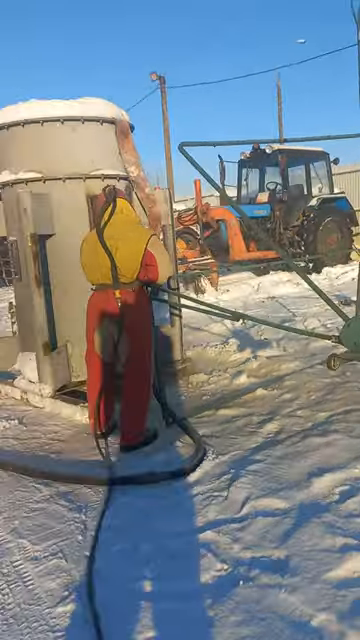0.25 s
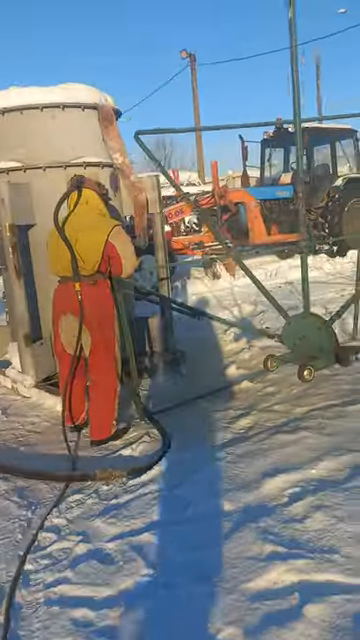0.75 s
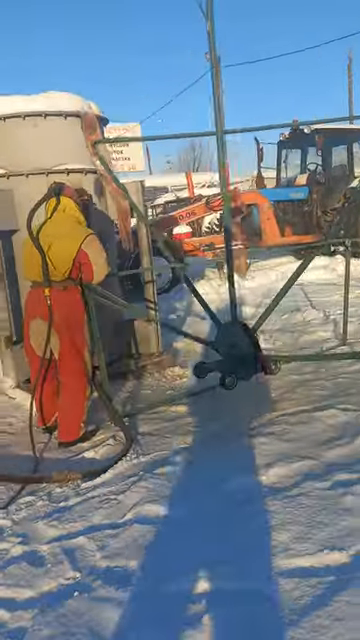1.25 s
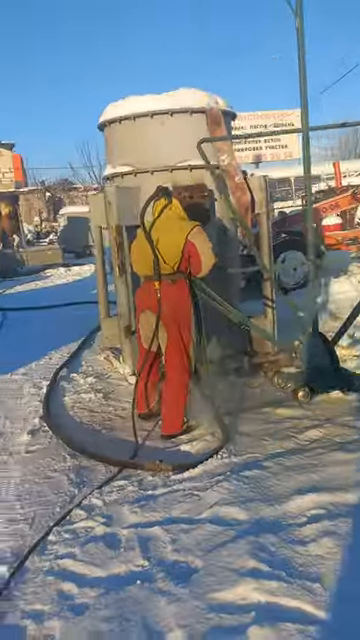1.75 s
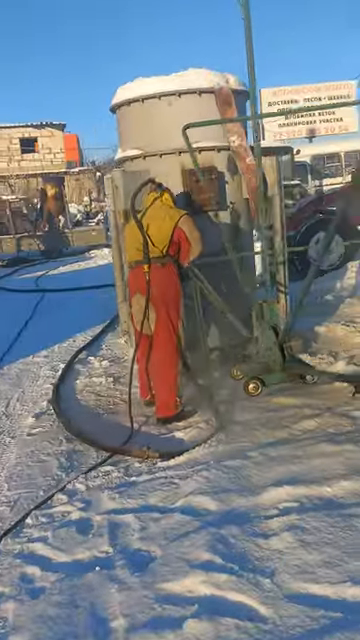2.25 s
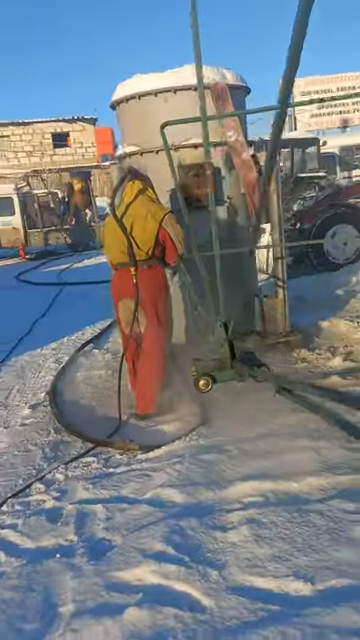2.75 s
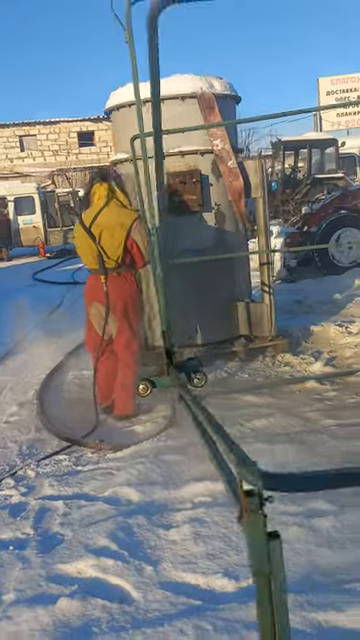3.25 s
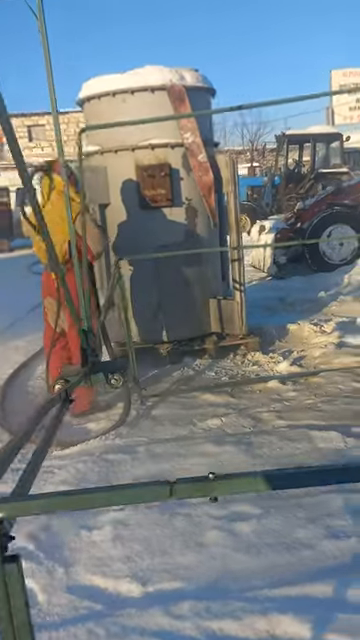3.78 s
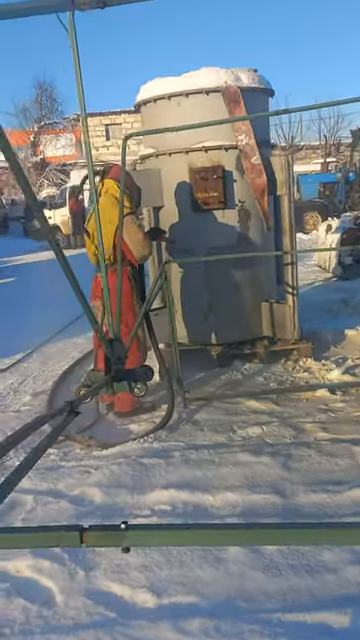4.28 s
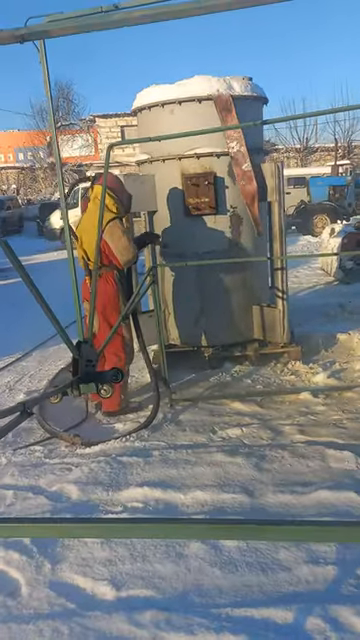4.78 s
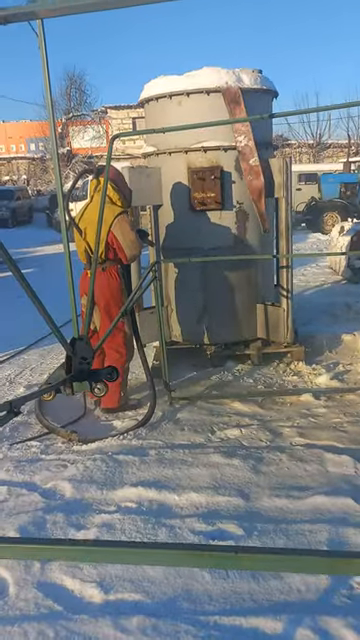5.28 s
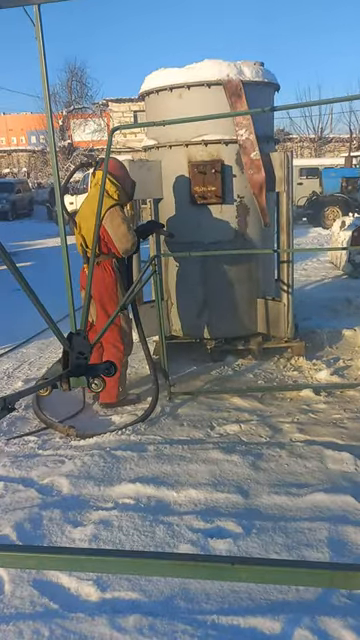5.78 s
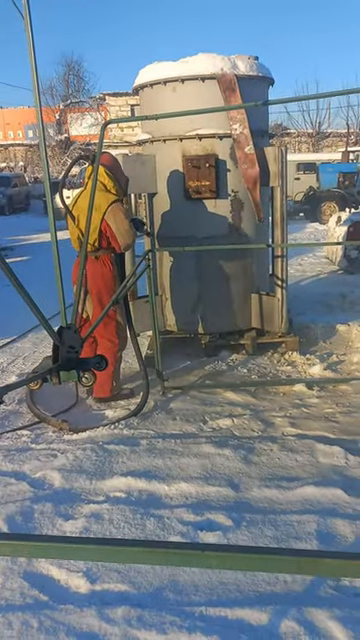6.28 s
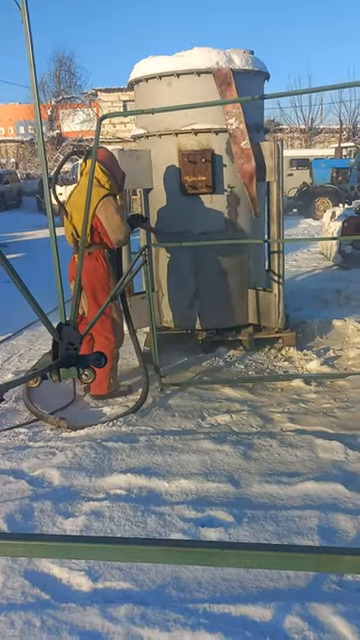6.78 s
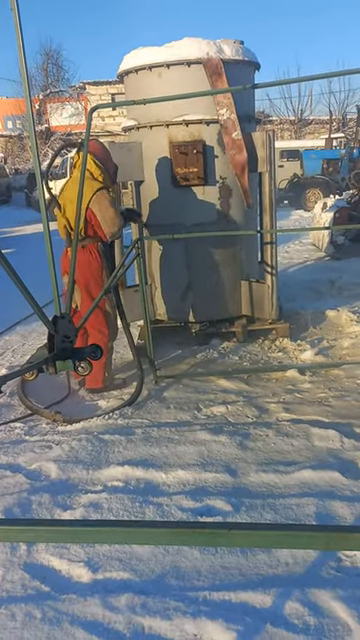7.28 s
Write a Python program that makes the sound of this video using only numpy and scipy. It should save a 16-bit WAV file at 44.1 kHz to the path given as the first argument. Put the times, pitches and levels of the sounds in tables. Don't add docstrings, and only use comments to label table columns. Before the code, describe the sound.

A loud, steady hiss of a sandblasting jet outdoors, dulled at first, then brighter with fizzing grit, over a faint low compressor hum.

```python
import sys
import numpy as np
from scipy import signal
from scipy.fft import rfft, irfft
from scipy.io import wavfile
from scipy.ndimage import uniform_filter1d

SR = 44100
rng = np.random.default_rng(int(sys.argv[2]) if len(sys.argv) > 2 else 0)


def gain_from_db(level_db):
    decades = np.asarray(level_db, float) / 20
    return 10 ** decades


def master(y):
    cut = np.clip(np.atleast_2d(y).T, -1, 1)
    pcm = np.round(cut * 32767)
    wavfile.write(sys.argv[1], SR, pcm.astype(np.int16))


N = 332073

# start_s, ground_echo_delay_ms, left_port_lead_us, direct_share (0-1)
WALK = [(0, .95, 0, .1), (1.2, .97, 0, .12), (1.5, .85, -30, .2), (2, .87, -30, .43), (3, 1.17, -28, .42),
        (3.3, 1.68, -8, .45), (3.7, 1.82, 22, .52), (4, 1.9, -8, .6), (4.4, 1.94, -18, .6),
        (5.25, 1.88, 8, .6), (5.75, 1.93, -4, .62), (7.53, 1.93, 14, .6)]


def evened(x):
    return x / np.sqrt(np.mean(np.abs(x) ** 2) + 1e-20)


def read(points, hz):
    f, value = np.transpose(points)
    return np.interp(np.log(hz + 1), np.log(f + 1), value)[:, None]


def curves(rows, t):
    s, *columns = np.transpose(rows)
    return [np.interp(t, s, c) for c in columns]


def bumps(rows, t, half_s=None):
    return sum(row[1] * np.exp(-((t - row[0]) / (half_s or row[2])) ** 2) for row in rows)


def grid(size):
    frames = 4 * N // size + 5
    z = rng.standard_normal((frames, size // 2 + 1, 6)).T
    hz = np.fft.rfftfreq(size, 1 / SR)
    t = np.arange(frames) * size / 4 / SR
    return hz, t, z[:3] + 1j * z[3:]


def sound(z, size):
    x = signal.istft(z, nperseg=size, noverlap=3 * size // 4)[1][..., :N]
    return x * np.sqrt(SR / 2) / np.sqrt(size / 3)


def patches(shape, bins, frames):
    hills = rng.standard_normal(shape[::-1]).T
    return evened(uniform_filter1d(uniform_filter1d(hills, bins, 0), frames, 1))


def band_db(colour_db, hz, lo_hz, hi_hz):
    inside = (hz > lo_hz) & (hz < hi_hz)
    return 10 * np.log10(np.sum(gain_from_db(2 * colour_db[inside])) * hz[1])


def shaded(t):
    return np.clip((1.7 - curves(WALK, t)[0]) / .5, 0, 1)


def compressor():
    # middle_s, change_db, half_length_s
    lulls = [
        (2.05, -4, 0.34),
        (2.8, -2, 0.24),
        (4.3, -4, .25),
    ]
    # frequency_hz, density_db (per Hz)
    rumble_colour = [(25, -32), (38, -26), (45, -5), (65, -16), (100, -2.5), (130, -5.5), (200, -25.5),
                     (400, -30.5)]
    firing_hz, hum_db, fade_db_per_s = 86, -43, -0.44
    rumble_db, rumble_fade_db_per_s = -40.5, -.6

    t = np.arange(N) / SR
    waver = rng.standard_normal((2, N))
    waver = evened(uniform_filter1d(uniform_filter1d(waver, size=3000), size=3000))
    phase = 2 * np.pi * np.cumsum(firing_hz + 0.9 * waver[0]) / SR
    level_db = hum_db + fade_db_per_s * t + bumps(lulls, t) + 1.9 * waver[1]
    partials = np.sin(phase) + gain_from_db(-32.0) * np.sin(phase / 2) + gain_from_db(-12) * np.sin(3 * phase / 4)
    tone = np.sqrt(2) * gain_from_db(level_db) * partials

    z = rfft(rng.standard_normal((3, N)))
    colour = gain_from_db(read(rumble_colour, np.fft.rfftfreq(N, 1 / SR))[:, 0])
    rumble = evened(irfft((z[0] + .65 * z[1:]) * colour, N))
    rumble *= gain_from_db(rumble_db + rumble_fade_db_per_s * t)
    return (tone + rumble) * gain_from_db([[.7], [-.7]])


def rush():
    # middle_s, level_db, half_length_s
    puffs = [
        (0.597, -37.5, 0.18),
        (1.0, -42, 0.36),
        (1.603, -41, 0.18),
        (2.1, -44, 0.37),
        (2.42, -33, .14),
        (2.68, -27.5, .17),
        (2.94, -31.5, 0.15),
    ]
    # frequency_hz, density_db (per Hz)
    rush_colour = [(30, -65), (60, -38), (95, -13), (150, -6), (260, 0), (350, -1), (430, -3), (520, -9),
                   (600, -17), (800, -20), (1100, -40)]
    draught_db, draught_shaded_db = -44.5, 1.5
    crest_s, rise_s, fall_s = 2.61, .035, 0.24
    crest_db, floor_db = -34.5, -70
    open_likeness = .4

    hz, t, z = grid(size=1024)
    puff_power = sum(gain_from_db(2 * (db - 6.0 * abs((t - s) / half) ** 2.4)) for s, db, half in puffs)
    draught_power = gain_from_db(2 * (draught_db + draught_shaded_db * shaded(t)))
    low_db = 10 * np.log10(puff_power + draught_power)
    pitch = .64 + .019 * (low_db - draught_db)
    colour = read(rush_colour, hz[:, None] / pitch)[:, 0]

    crest = np.exp(-((t - crest_s) / np.where(t < crest_s, rise_s, fall_s)) ** 2)
    upper_db = floor_db + (crest_db - floor_db) * crest - low_db
    bright = gain_from_db(2 * upper_db) * np.exp(-((hz[:, None] - 1050) / 300) ** 2)

    field_db = 10 * np.log10(gain_from_db(2 * colour) + bright + 1e-9)
    field_db += low_db - band_db(read(rush_colour, hz), hz, 130, 450)
    field_db += 1.9 * patches(z[0].shape, bins=3, frames=8)
    same = open_likeness + (1 - open_likeness) * np.sqrt(shaded(t))
    ports = np.sqrt(same) * z[0] + np.sqrt(1 - same) * z[1:]
    return sound(ports * gain_from_db(field_db), size=1024) * gain_from_db([[-.5], [.5]])


def jet_bands(t):
    # start_s, level_db
    body_curve = [(0, -34), (.3, -33), (.95, -30.5), (1.35, -31.5), (1.6, -33.5), (2.3, -36), (3.0, -35.5),
                  (3.35, -33.5), (3.9, -31.5), (4.75, -28.5), (5.27, -33.5), (5.8, -30), (6.1, -30.5),
                  (6.5, -35), (6.9, -29.5), (7.53, -32)]
    # start_s, level_db
    grit_curve = [(0, -31), (.3, -32), (1.3, -28.5), (1.85, -29), (2.2, -31), (2.75, -30), (3.22, -31),
                  (3.36, -26.5), (3.7, -24), (4.75, -24), (6.5, -26), (7.53, -25)]
    # middle_s, hiss_db, half_length_s
    swings = [(1.0, -1, 0.23), (1.3, 1, .15), (2.7, -1.5, 0.22), (3.1, 1.5, 0.18), (4.15, 0.5, 0.12),
              (4.7, -4.5, 0.28), (5.55, 1.5, 0.091), (5.85, -3.5, .16), (6.75, 1, .1), (7.05, -2.5, 0.18),
              (7.38, 0.5, 0.1)]
    # middle_s, change_db
    spurts = [(.58, 2.5), (.94, 4), (1.07, -1), (1.247, 2), (1.666, 0), (1.76, 2), (1.896, 5), (2.13, -2),
              (2.265, 2.5), (2.434, -2), (2.689, 2), (3.248, -1), (3.697, 0.5), (4.18, 3), (4.265, -2.5),
              (4.34, 2.5), (4.704, 3), (4.819, -2.5), (5.108, -3), (5.81, 4), (5.887, 3.5), (6.031, 2.5),
              (6.301, -1.5), (6.49, -4), (6.705, 0.5), (6.81, 0)]

    spurt_db = bumps(spurts, t, half_s=.02)
    body_db = curves(body_curve, t)[0]
    fizz_db = curves(grit_curve, t)[0]
    hiss_db = body_db + 11 - 3.5 * shaded(t) + bumps(swings, t)
    return body_db + .3 * spurt_db, hiss_db + .3 * spurt_db, fizz_db + 1.1 * spurt_db


def jet_level(hz, t, colour):
    body_db, hiss_db, fizz_db = jet_bands(t)
    body_db = body_db - band_db(colour, hz, 800, 3000) + 3
    hiss_db = hiss_db - band_db(colour, hz, 3500, 7000) + 3
    fizz_db = fizz_db - band_db(colour, hz, 9000, 15500) + 4
    upper = np.clip((hz[:, None] - 2800) / 1200, 0, 1)
    top = np.clip((hz[:, None] - 6500) / 2000, 0, 1)
    level_db = (1 - upper) * body_db + (upper - top) * hiss_db + top * fizz_db
    level_db += 0.9 * (0.17 + top) * patches((1, len(t)), bins=1, frames=6)
    return level_db + 1.13 * patches(level_db.shape, bins=7, frames=30)


def ground_comb(hz, t):
    # frequency_hz, gain_db
    echo_db = [(300, -1.5), (2300, -3), (3200, -8), (5500, -5), (9000, -9)]
    echo_open, echo_shaded = 0.75, 0.22

    echo = echo_open + (echo_shaded - echo_open) * shaded(t)
    bounce = echo * gain_from_db(read(echo_db, hz))
    hand = np.clip(1300 / (hz[:, None] + 1), .3, 1)
    bounce = np.array([bounce, bounce * hand])
    delay_ms = curves(WALK, t)[0] * np.reshape([1, .92], (2, 1, 1))
    echo_turn = np.exp(-2j * np.pi * hz[:, None] * delay_ms / 1000)
    return abs(1 + bounce * echo_turn) / np.sqrt(1 + bounce ** 2)


def port_turn(hz, t):
    # frequency_hz, lead_rad
    port_phase = [(170, 0), (690, .8), (1030, .4), (1600, 2.0), (1980, 2.9), (2340, 3.3), (2580, 5.2),
                  (3100, 7.7), (3800, 9.7), (4820, 12), (5600, 11.4), (6720, 11.5), (10200, 13.7),
                  (15700, 18.4)]
    lead_us = curves(WALK, t)[1]
    bearing = 2.6 * np.pi * np.maximum(hz[:, None] - 3000, 0) * lead_us / 10 ** 6
    sway = .12 * np.clip(hz[:, None] / 2000, 0, 1) * patches((1, len(t)), bins=1, frames=70)
    return np.exp(1j * (read(port_phase, hz) + bearing + sway))


def jet():
    # frequency_hz, density_db (per Hz)
    left_port = [(250, -15), (700, -14.5), (1200, -14), (2000, -8), (3500, -7), (4700, -7), (5700, -2.4),
                 (6400, -8), (7500, -21.5), (8300, -21), (9700, -15.5), (10700, -9), (13500, -6.5),
                 (15700, -7)]
    # frequency_hz, density_db (per Hz)
    right_port = [(250, -17.5), (850, -14.5), (1150, -8), (2200, -9), (2600, -10), (3000, -13.5),
                  (3500, -11), (4400, -14.5), (5300, -31), (7300, -58.5), (9700, -45), (10700, -24.5),
                  (13500, -21), (15700, -27)]
    # frequency_hz, exponent
    focus = [(300, .2), (1000, .09), (2200, .08), (3000, .55), (3750, .15), (4500, .4), (5500, .55),
             (8000, .6), (12000, .6)]
    # frequency_hz, gain_db
    shade_db = [(900, -3.5), (1300, 0), (1800, -3.5), (2300, -6.5), (2800, -2.5), (3300, 2.5), (4200, -3),
                (5000, 10), (7000, 0), (12000, 1.5)]

    hz, t, (shared, left, right) = grid(size=512)
    delay_ms, _, share = curves(WALK, t)
    colour = np.array([read(left_port, hz), read(right_port, hz)])
    level_db = jet_level(hz, t, colour[0])

    direct = share ** read(focus, hz)
    near = np.sqrt(direct) * ground_comb(hz, t) * shared
    turn = port_turn(hz, t)
    ports = near * np.array([turn, np.ones(turn.shape)])
    ports += np.sqrt(1 - direct) * np.array([left, right])

    fullness = np.exp(-((hz[:, None] - 600) / 200) ** 2)
    ports *= gain_from_db(shaded(t) * 3.8 * fullness)
    right_shade = np.clip((1.35 - delay_ms) / .42, 0, 1)
    sway_db = 1.0 * patches(shared.shape, bins=4, frames=90)
    ports[1] *= gain_from_db(right_shade * read(shade_db, hz) + sway_db)
    lows_cut = np.clip(hz[:, None] / 300, 0, 1) ** 2
    return sound(ports * gain_from_db(colour + level_db) * lows_cut, size=512)


def scene():
    return jet() + rush() + compressor()


def roll_off(x):
    return signal.sosfilt(signal.butter(12, 15800, fs=SR, output="sos"), x)


def record(dry):
    squeezed = dry / (1 + (dry / .75) ** 4) ** .25
    taps = signal.firwin(1201, 15740, window=("kaiser", 9), fs=SR)
    return roll_off(signal.oaconvolve(squeezed, taps[None], "same"))


dry = scene()
out = record(dry)
master(out)
```